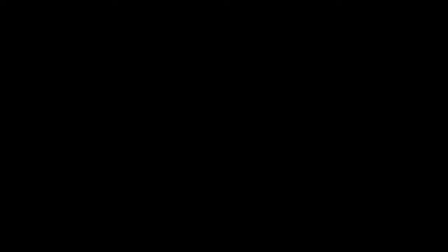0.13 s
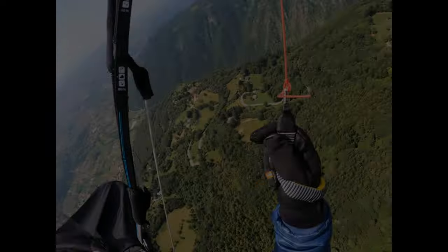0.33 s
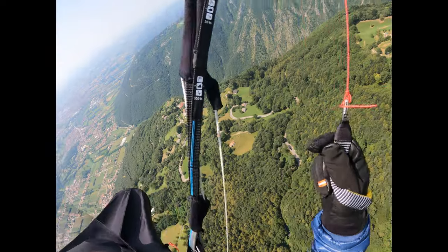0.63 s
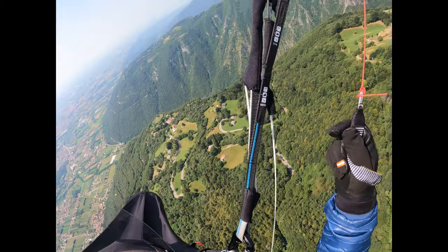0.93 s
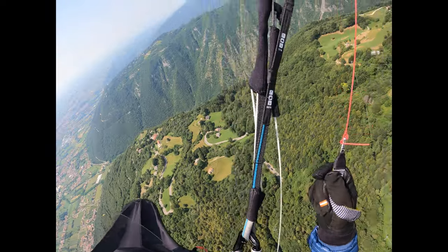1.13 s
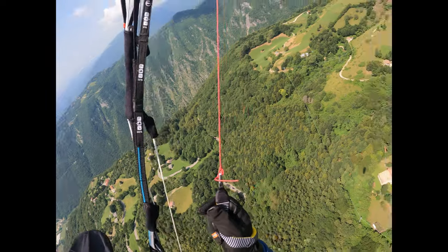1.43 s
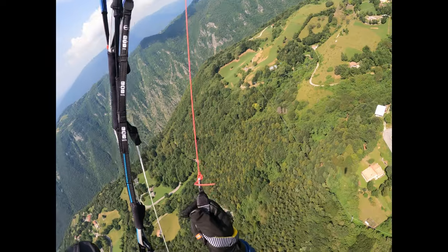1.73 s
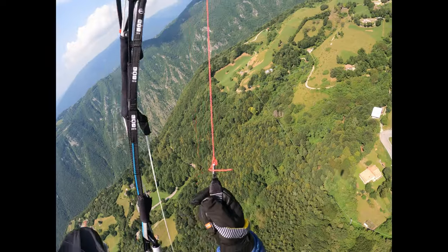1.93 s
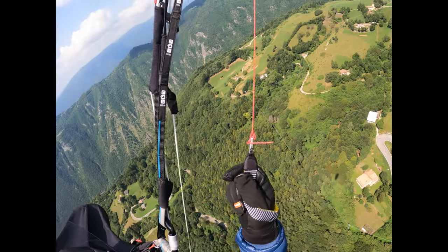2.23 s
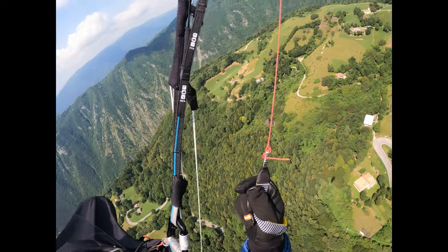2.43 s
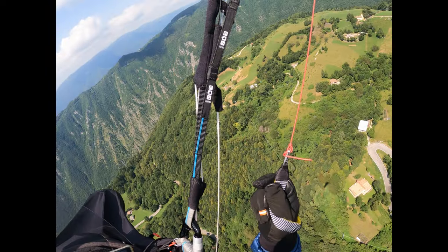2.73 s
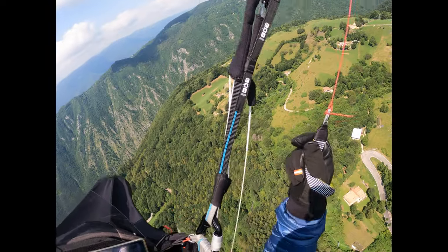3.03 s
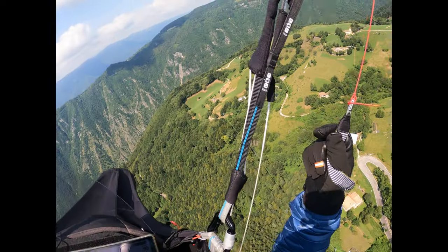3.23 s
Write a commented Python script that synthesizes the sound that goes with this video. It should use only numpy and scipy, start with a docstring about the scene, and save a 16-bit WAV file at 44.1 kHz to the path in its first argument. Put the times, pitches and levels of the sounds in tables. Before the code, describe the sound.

Wind overloads a close microphone on a paraglider in open air. A deep, churning rumble runs throughout under airy rush and thin hiss. The rush builds to about 1.2 s with faint breathy whistling from the lines, then roars and cuts back at 1.3 s. Dull buffets and sharp bumps cluster at 1.5-1.85 s, become sparse, then thicken again around 2.9-3.2 s before easing.

```python
"""Air streams past a camera on a paraglider in flight. From the start the microphone port rumbles and churns,
under shaped noise for the rush and a thin hiss; dull noise puffs soon begin as eddies hit the port.
The rush builds, lines sing as breathy narrow bands, wider bands roar, then it breaks off as the airflow shifts.
After that, buffets come in clusters with short pulse bumps between them; the rush swells once more near
the end. Two faint high processing chirps of the recorder are gliding sines, one before the break and one late."""
import sys
import numpy as np
from scipy.fft import rfft, irfft, next_fast_len
from scipy.io import wavfile
from scipy.ndimage import uniform_filter1d, minimum_filter1d, map_coordinates

SR = 44100
rng = np.random.default_rng(int(sys.argv[2]) if len(sys.argv) > 2 else 0)


def transcribe(u):
    """Save the signal u as a 16-bit wav file named by the first command-line argument.

    u: samples, shape (n,) or (channels, n), limited to [-1, 1]; the rate is SR.
    q: integer samples, one column per channel.
    """
    v = np.clip(np.atleast_2d(u).T, -1, 1)
    q = np.round(v * 32767).astype(np.int16)
    wavfile.write(sys.argv[1], SR, q)


N = 148617

# attached airflow, before any layer's own trim: t/s, level/dB
RUSH_LEVELS = [(.04, -38), (.36, -37), (.5, -36), (.8, -34), (1.08, -33), (1.22, -31.5), (1.305, -36),
               (1.325, -46.5), (1.42, -41), (1.7, -41), (1.95, -43), (2.2, -44), (2.6, -42.5), (2.92, -38),
               (3.02, -41), (3.18, -45), (3.24, -41.5), (3.37, -42.5)]


def amp(db):
    """Decibels to gain."""
    return 10 ** (np.asarray(db) / 20)


def unit(x):
    """Scale to rms 1."""
    return x / np.sqrt(np.mean(x ** 2) + 1e-20)


def curve(rows):
    """(t/s, value) points to one value per sample."""
    return np.interp(np.arange(N) / SR, *np.transpose(rows))


def along(points, hz):
    """(f/Hz, level/dB) points to gain, read on a log frequency axis."""
    f, db = np.transpose(points)
    return amp(np.interp(np.log(hz + 1), np.log(f), db))


def wobble(knots_per_s):
    """Smooth random curve through normal-distributed knots."""
    knots = rng.standard_normal(4096)
    return map_coordinates(knots, [np.arange(N) * knots_per_s / SR + 2], mode="wrap")


def dome(t, sigma_s):
    """Gaussian swell around t = 0."""
    return np.exp(-(t / sigma_s) ** 2 / 2)


def filtered(x, response):
    """x times a response of frequency."""
    m = next_fast_len(len(x) + 8192)
    spectrum = rfft(x, m) * response(np.fft.rfftfreq(m, 1 / SR))
    return irfft(spectrum, m)[:len(x)]


def noise(colour):
    """Noise of rms 1 with a spectrum of (f/Hz, level/dB) points."""
    return unit(filtered(rng.standard_normal(N), lambda hz: along(colour, hz)))


def flow(levels, colour, flutter_db, flutter_knots_per_s):
    """Air noise that follows its level curve and flutters with the turbulence."""
    flutter = amp(flutter_db * wobble(flutter_knots_per_s))
    return amp(curve(levels)) * unit(noise(colour) * flutter)


def narrow_band(centre_s, length_s, hz, glide_hz_per_s, knots_per_s):
    """Swell of narrow noise around a gliding pitch; faster knots widen the band."""
    evenness = 0.56  # 0 = flickers like noise, 1 = steady strength
    t = np.arange(N) / SR - centre_s
    drift = wobble(knots_per_s) + 1j * wobble(knots_per_s)
    strength = unit(np.abs(drift) ** (1 - evenness))
    drift = strength * np.exp(1j * np.angle(drift))
    carrier = np.exp(2j * np.pi * (hz + glide_hz_per_s * t / 2) * t)
    tone = np.sqrt(2) * np.real(drift * carrier)
    return np.exp(-np.square(2 * t / length_s) ** 2 / 2) * tone


def rumble():
    """Steady pressure swings at the port, more even in strength than plain noise."""
    # spectrum: f/Hz, level/dB
    colour = [(10, -6), (25, -0.5), (45, 2), (65, 4.5), (110, -3), (150, -14.5), (250, -22), (600, -73),
              (2000, -120)]
    level_db, window_s, evenness = -19.5, 0.045, 0.36
    x = noise(colour)
    power = np.abs(uniform_filter1d(x ** 2, max(int(window_s * SR), 3)))
    power = np.abs(uniform_filter1d(power, size=900)) + 1e-6
    return amp(level_db) * unit(x / power ** (evenness / 2))


def churning():
    """Low churning of the air around the port: fluttering low noise."""
    # level before trim: t/s, level/dB
    levels = [(.04, -32), (.17, -32), (.29, -24), (.5, -30), (.85, -32.5), (1.15, -27), (1.3, -30.5),
              (1.44, -28.5), (1.66, -27), (2.0, -30), (2.45, -33), (2.85, -29), (3.05, -24), (3.2, -30),
              (3.37, -33.5)]
    # spectrum: f/Hz, level/dB
    colour = [(40, -14), (90, 4), (130, 4), (200, -5.5), (300, -7), (520, -17.5), (750, -20.5),
              (1200, -45.5), (3000, -65), (9000, -110)]
    trim_db = 2.5
    return amp(trim_db) * flow(levels, colour, flutter_db=3.0, flutter_knots_per_s=70)


def rush():
    """Attached airflow: broadband noise that follows the rush level."""
    # spectrum: f/Hz, level/dB
    colour = [(60, -7.5), (250, -0.5), (400, 0.5), (570, 2), (800, -5.5), (1100, -6), (1500, -10.5),
              (2100, -15.5), (3200, -18.5), (4500, -26), (7000, -41.5), (9000, -48), (12000, -73),
              (16000, -90.5)]
    trim_db = 2
    return amp(trim_db) * flow(RUSH_LEVELS, colour, flutter_db=0.45, flutter_knots_per_s=160)


def sizzle():
    """The faster the air, the brighter its rush: treble grows faster than the rush level."""
    # spectrum: f/Hz, level/dB
    colour = [(1200, -27), (2200, -11), (2900, 3), (3800, 3), (4800, -12.5), (6500, -19.5), (9000, -46.5),
              (14000, -81.5)]
    level_db, growth_db_per_db, reference_rush_db = -42, 2.38, -29  # level_db holds at the reference rush
    above_reference_db = curve(RUSH_LEVELS) - reference_rush_db
    return amp(level_db + growth_db_per_db * above_reference_db) * noise(colour)


def hiss():
    """Thin treble noise on its own level curve."""
    # level before trim: t/s, level/dB
    levels = [(.05, -52), (.4, -49), (.55, -49.5), (.61, -46.5), (.78, -53), (1.11, -47), (1.25, -55),
              (1.335, -62), (1.41, -50.5), (1.51, -51.5), (1.595, -68.5), (1.67, -55), (1.755, -70),
              (1.79, -57), (1.85, -59.5), (2.2, -57.5), (2.57, -54.5), (2.67, -50.5), (2.97, -52.5),
              (3.04, -59.5), (3.16, -68), (3.25, -58), (3.37, -61)]
    # spectrum: f/Hz, level/dB
    colour = [(500, -17), (2000, -2), (3300, -7), (4500, 1.5), (6000, 1.5), (7200, -5), (8100, -11.5),
              (9000, -27), (10500, -28.5), (12500, -44), (16000, -76)]
    trim_db = -2.5
    return amp(trim_db) * flow(levels, colour, flutter_db=1.0, flutter_knots_per_s=80)


def lulls():
    """Gain curve of the moments when the rumble sags, as Gaussian dips in dB."""
    # dips: centre t/s, sigma/s, depth/dB
    dips = [(0.167, 0.0052, 15), (0.455, 0.007, 8), (0.686, 0.013, 5), (0.784, 0.02, 4.5),
            (1.17, 0.0047, 5), (1.27, 0.01, 0), (1.357, 0.016, 6), (1.491, 0.0062, 6), (1.605, .007, 5),
            (1.635, 0.012, 7.5), (2.098, 0.0067, 14), (2.237, 0.0074, 11), (2.5, 0.015, 7.5),
            (3.191, 0.0088, 18)]
    t = np.arange(N) / SR
    return amp(-sum(depth_db * dome(t - s, sigma_s) for s, sigma_s, depth_db in dips))


def buffets():
    """Each eddy is a swell of dull noise, its corner set by its speed, with a spray of brighter noise on top."""
    # eddies: centre t/s, sigma/s, level before trim/dB, corner f/Hz, spray level/dB
    eddies = [(0.385, 0.0058, -23.5, 405, -46), (0.615, 0.0049, -23, 550, -46),
              (1.097, 0.0093, -14.5, 198, -37), (1.18, 0.05, -25.5, 523, -55),
              (1.254, 0.016, -22, 850, -44), (1.293, 0.0073, -16.5, 870, -59),
              (1.368, 0.0086, -22, 355, -48), (1.506, 0.004, -13, 430, -60),
              (1.559, 0.0041, -11, 400, -41.5), (1.578, 0.025, -25.5, 783, -46),
              (1.589, 0.0055, -16, 580, -65), (1.691, 0.011, -20, 304, -56), (1.722, 0.003, -9, 330, -46),
              (1.736, 0.0043, -18, 750, -41), (1.769, 0.0062, -16.5, 790, -38.5),
              (1.755, 0.014, -26.5, 1000, -52), (1.787, 0.0069, -30, 1230, -37.5),
              (1.814, 0.013, -36, 1400, -39), (1.834, 0.0032, -11.5, 536, -54),
              (1.997, 0.0055, -20.5, 300, -64), (2.15, 0.0034, -22, 300, -67),
              (2.254, 0.0089, -19.5, 332, -66), (2.679, 0.0058, -21, 260, -54),
              (2.753, 0.0056, -23, 594, -53), (2.922, 0.0045, -22, 330, -46),
              (2.996, 0.0051, -14, 265, -53), (3.022, 0.0071, -14, 298, -56),
              (3.06, 0.0037, -11.5, 423, -34.5), (3.09, 0.01, -20.5, 280, -40),
              (3.11, 0.0042, -17, 220, -44), (3.127, 0.0053, -11.5, 333, -35),
              (3.162, 0.0019, -13.5, 350, -37)]
    # port response to a buffet: f/Hz, gain/dB
    port_colour = [(40, 3), (110, 12), (165, 6.5), (230, 2), (330, -2), (520, 2), (760, -5.5), (1080, -5),
                   (1500, 0), (3000, -9.5)]
    # spray spectrum: f/Hz, level/dB
    spray_colour = [(400, -13), (1000, 10), (1600, -1), (2300, -1), (3200, -5.5), (4500, -19), (7000, -37),
                    (9000, -48), (14000, -80)]
    trim_db, low_edge_hz, slope_order = -2.5, 109, 2.78
    out = np.zeros(N + SR)
    t = np.arange(-4096, 4096) / SR
    spray = np.pad(noise(spray_colour), (0, SR))
    for s, sigma_s, db, corner_hz, spray_db in eddies:
        def shape(hz):
            low_cut = hz ** 2 / (hz ** 2 + low_edge_hz ** 2)
            high_cut = 1 / np.sqrt(1 + (hz / corner_hz) ** (2 * slope_order))
            return along(port_colour, hz) * low_cut * high_cut

        swell = dome(t, sigma_s)
        at = np.arange(len(t)) + round(s * SR) - len(t) // 2
        puff = filtered(rng.standard_normal(len(t)) * swell, shape)
        puff *= np.linalg.norm(swell) / np.linalg.norm(puff)  # same energy at any corner
        out[at] += amp(db + trim_db) * puff + amp(spray_db) * swell * spray[at]
    return out[:N]


def processing_chirps():
    """Very faint, short, wavering, gliding sines, such as a recorder's noise reduction leaves."""
    # tones: centre t/s, length/s, f/Hz at centre, glide/(Hz/s), level/dB
    tones = [(0.82, .03, 8500, 29999.5, -59), (3.072, .05, 9060, -2000, -64)]
    waver_hz = 130
    out = np.zeros(N)
    for s, length_s, hz, glide_hz_per_s, db in tones:
        t = np.arange(N) / SR - s
        pitch_hz = hz + glide_hz_per_s * t + waver_hz * wobble(400)
        swell = np.exp(-np.square(2 * t / length_s) ** 2)
        out += amp(db) * swell * np.sin(2 * np.pi * np.cumsum(pitch_hz) / SR)
    return out


def whistles():
    """Taut lines shed vortices and sing with a breathy tone that follows the rush level."""
    # lines: centre t/s, length/s, f/Hz at centre, glide/(Hz/s), level over RUSH_LEVELS/dB
    lines = [(.99, 0.22, 1045, 1, -11.5), (1.16, 0.11, 1090, 604, -10.5), (1.08, 0.38, 1355, 100, -14.5),
             (2.67, 0.11, 2100, -300, -19)]
    knots_per_s = 49
    singing = sum(amp(db) * narrow_band(s, length_s, hz, glide, knots_per_s)
                  for s, length_s, hz, glide, db in lines)
    return amp(curve(RUSH_LEVELS)) * singing


def roars():
    """Larger vortices give a rough, hollow roar in one band as the gusts peak."""
    # vortices: centre t/s, length/s, f/Hz at centre, glide/(Hz/s), level/dB
    vortices = [(1.177, 0.071, 330, 897, -25.5), (1.25, 0.026, 700, 0, -24.5), (1.282, 0.059, 420, -3, -26),
                (1.289, 0.034, 847, -3, -31), (1.665, 0.08, 395.4, -4, -32.5),
                (1.737, 0.025, 972, 5999, -29.5), (1.742, 0.011, 369.6, 2, -18),
                (1.769, .016, 508.3, -1, -20), (1.783, 0.018, 1082, -1, -33), (3.015, 0.055, 240, 0, -22),
                (3.096, 0.012, 360, 2, -24)]
    knots_per_cycle = 0.4  # bandwidth scales with pitch
    return sum(amp(db) * narrow_band(s, length_s, hz, glide, knots_per_cycle * hz)
               for s, length_s, hz, glide, db in vortices)


def bumps():
    """Pointed pressure pulse with a brief swing back, as when the gear twitches."""
    # pulses: t/s, peak before filtering/dB, rise time constant/ms, treble edge f/Hz
    pulses = [(1.247, -8.5, 0.37, 1800), (1.31, -0.5, .33, 2800), (1.508, -3, 0.42, 1390),
              (1.556, -17, 0.46, 2200), (1.585, -8.5, 0.46, 1600), (1.7073, -7.5, 0.26, 3800),
              (1.733, -7, .35, 1800), (1.762, -7.5, .35, 1810), (1.8291, -5, 0.47, 2200),
              (1.857, -19.5, 0.18, 2600), (2.155, -8, 0.26, 2200), (2.241, -12.5, 0.45, 1300),
              (2.309, -10.5, 0.25, 4600), (2.75, -12.5, 0.21, 2000), (2.9, -6.5, 0.16, 3200),
              (3.0255, -7.5, 0.45, 1500), (3.0595, -6, 0.31, 4500), (3.104, 0, 0.41, 1900),
              (3.1269, -5.5, 0.29, 3200), (3.161, -9, 0.66, 3400)]
    ring_hz, fall_over_rise = 105, 2
    out = np.zeros(N + SR)
    ms = np.arange(-4096, 4096) / SR * 1000

    def swing(u):
        """Damped second-order high-pass: the port swings back."""
        return -u * u / (1 - u * u + 1j * u)

    for s, db, rise_ms, edge_hz in pulses:
        constant_ms = rise_ms * np.where(ms > 0, fall_over_rise, 1)
        pulse = amp(db) * np.exp(-np.abs(ms) / constant_ms)
        dulled = filtered(pulse, lambda hz: swing(hz / ring_hz) / (1 + (hz / edge_hz) ** 6))
        out[round(s * SR) - len(ms) // 2:][:len(ms)] += dulled
    return out[:N]


def scene():
    """All layers meet at one microphone."""
    churn_lull_share = 0.4  # how far the churning sags with the rumble, 0-1
    lull = lulls()
    low = lull * rumble() + lull ** churn_lull_share * churning()
    air = rush() + sizzle() + hiss()
    events = buffets() + processing_chirps() + whistles() + roars() + bumps()
    return (low + air + events)[None]


def record(dry):
    """The recorder starts, eases its gain down on the highest peaks and keeps nothing above its band limit."""
    start_s, ceiling, top_hz = 0.033, 0.69, 16000
    fade_in = np.clip((np.arange(N) - start_s * SR) / 128, 0, 1)
    x = dry[0] * fade_in
    needed = np.minimum(1, ceiling / (np.abs(x) + 1e-9))
    gain = uniform_filter1d(minimum_filter1d(needed, size=300), size=300)
    return filtered(x * gain, lambda hz: hz < top_hz)[None]


dry = scene()
out = record(dry)
transcribe(out)
```